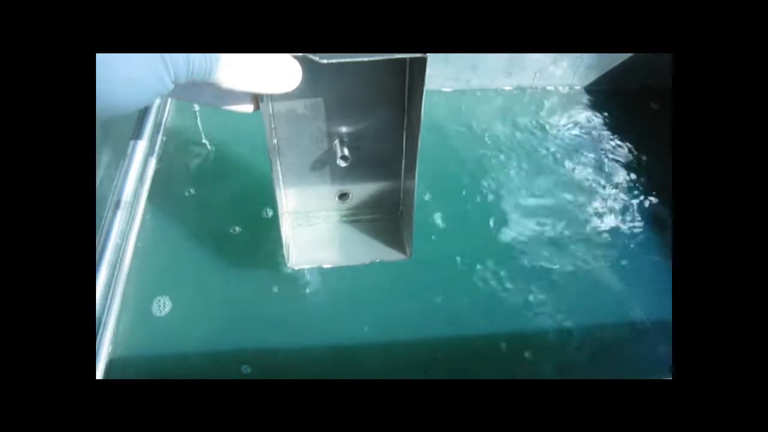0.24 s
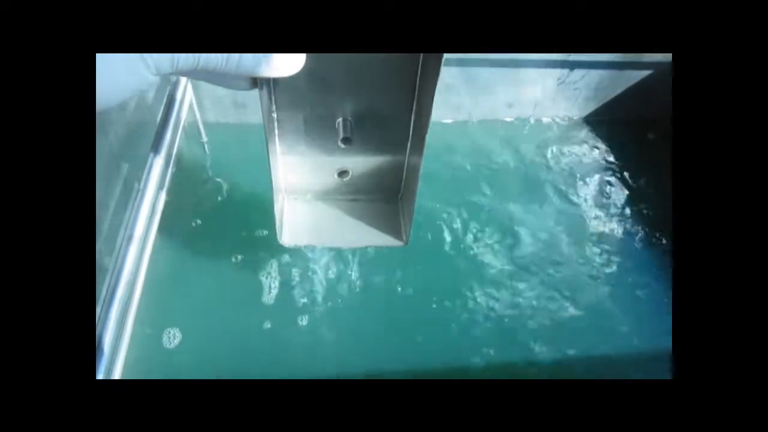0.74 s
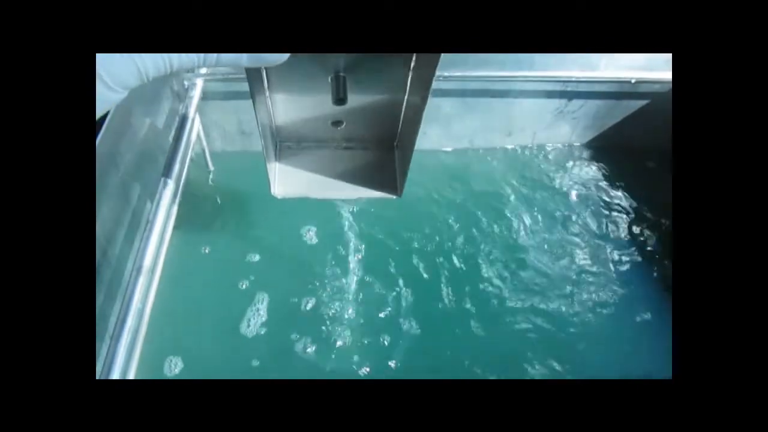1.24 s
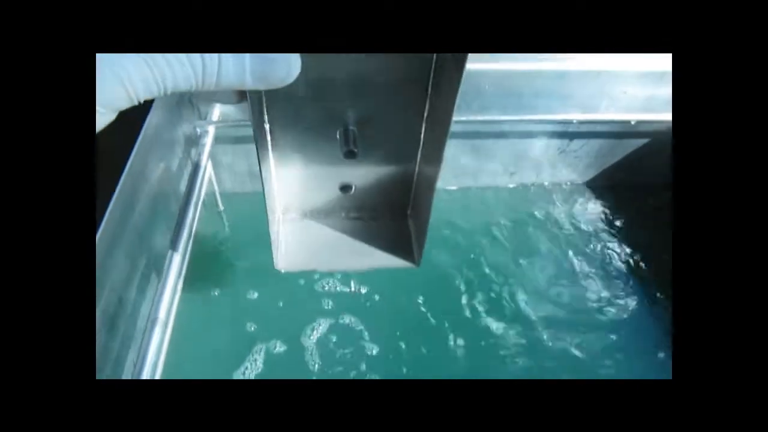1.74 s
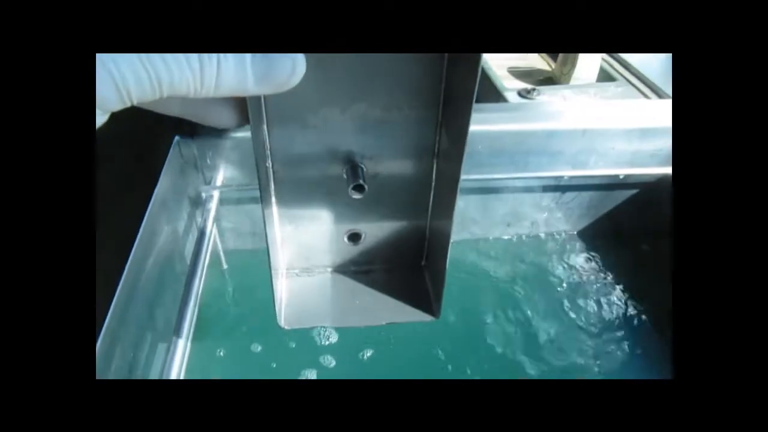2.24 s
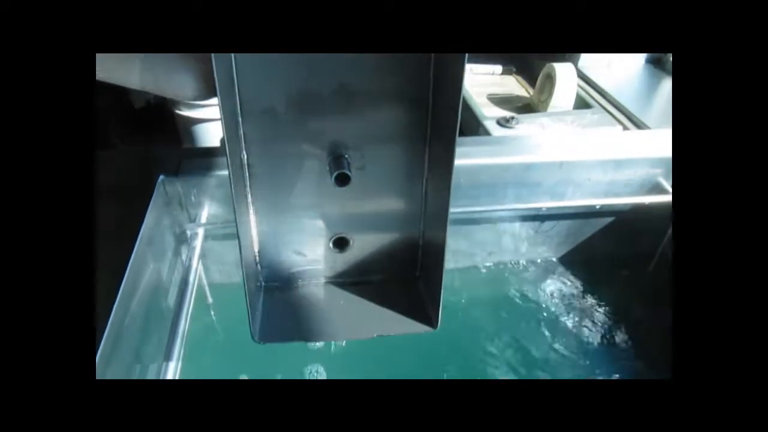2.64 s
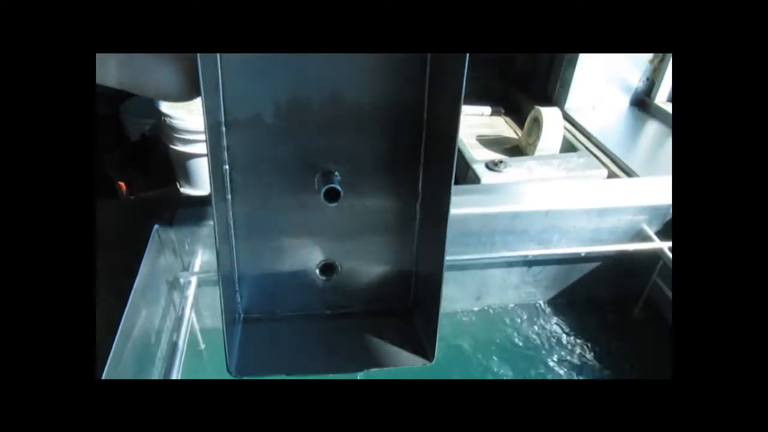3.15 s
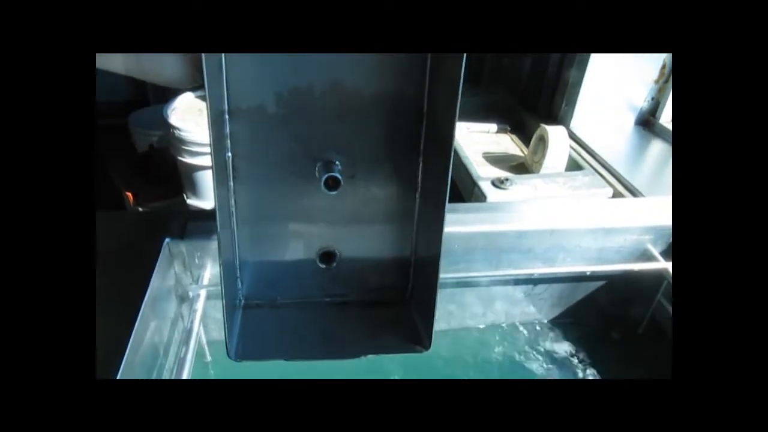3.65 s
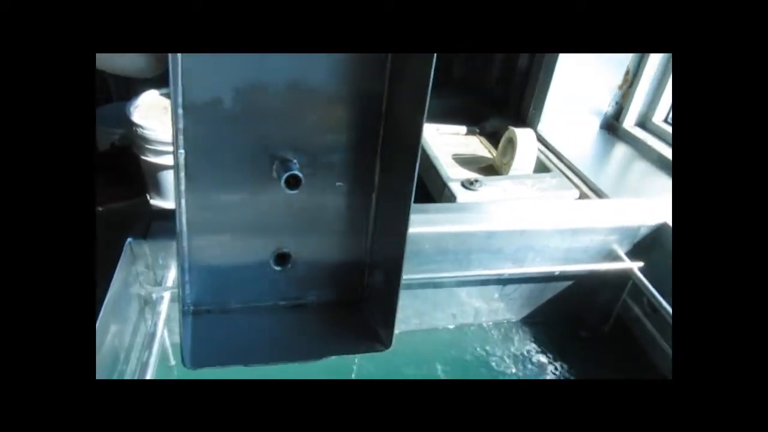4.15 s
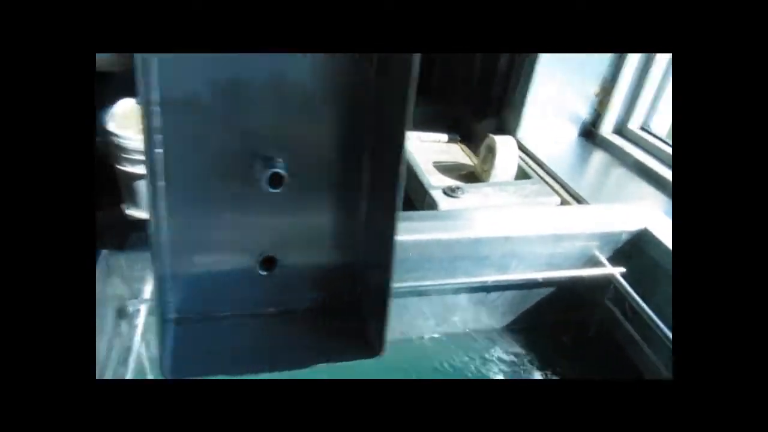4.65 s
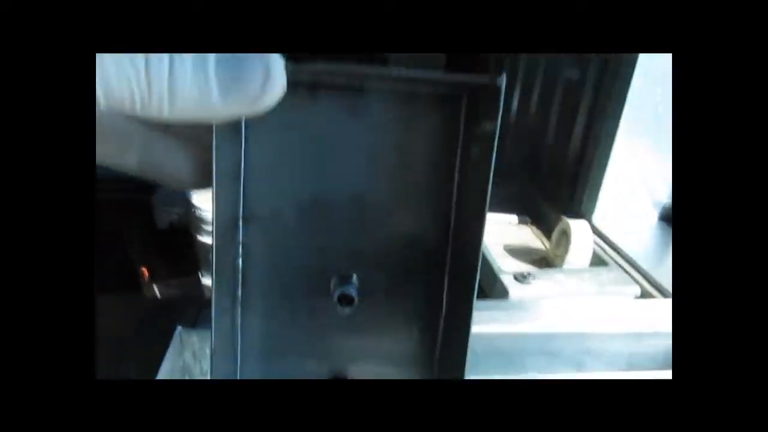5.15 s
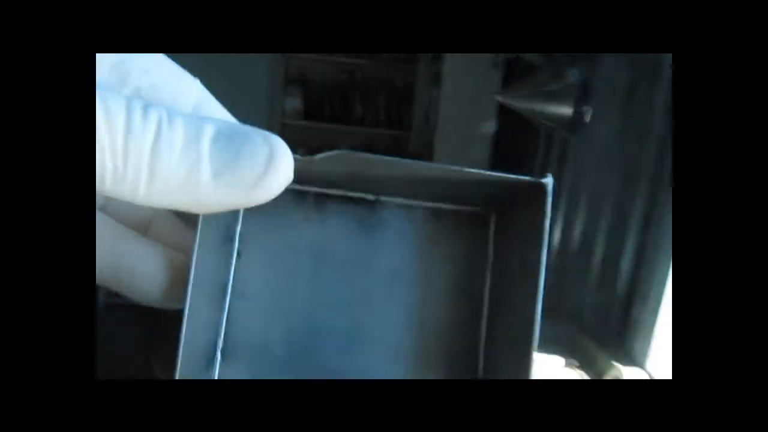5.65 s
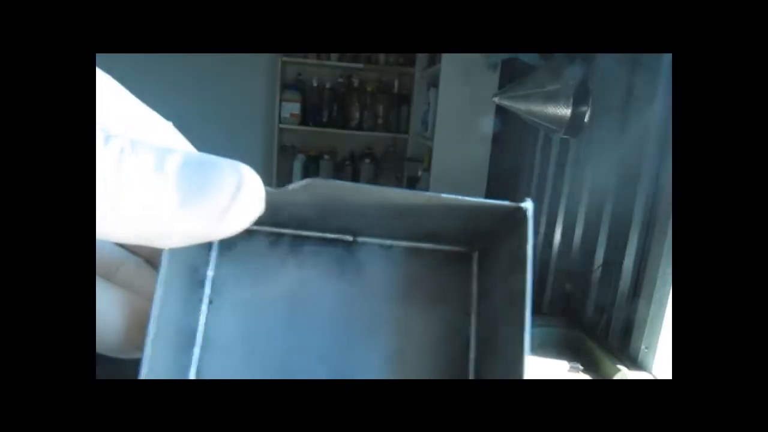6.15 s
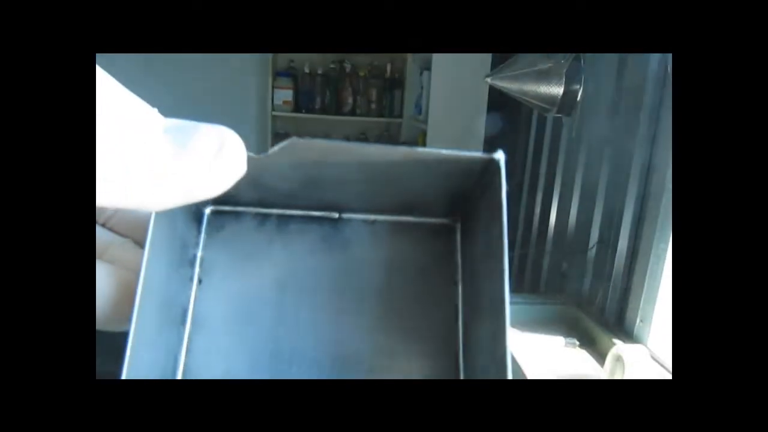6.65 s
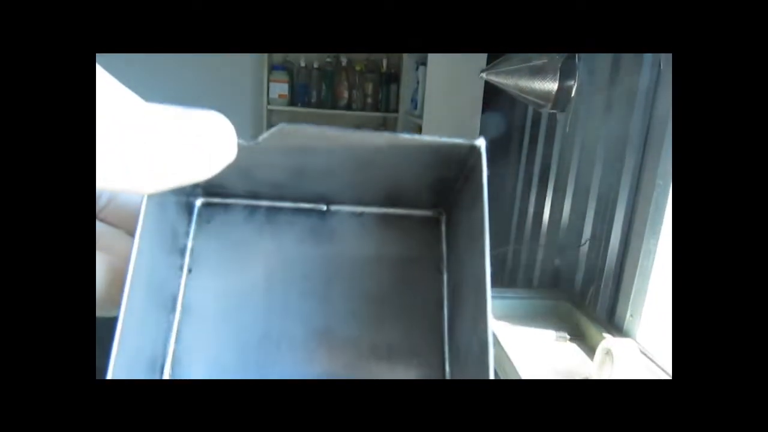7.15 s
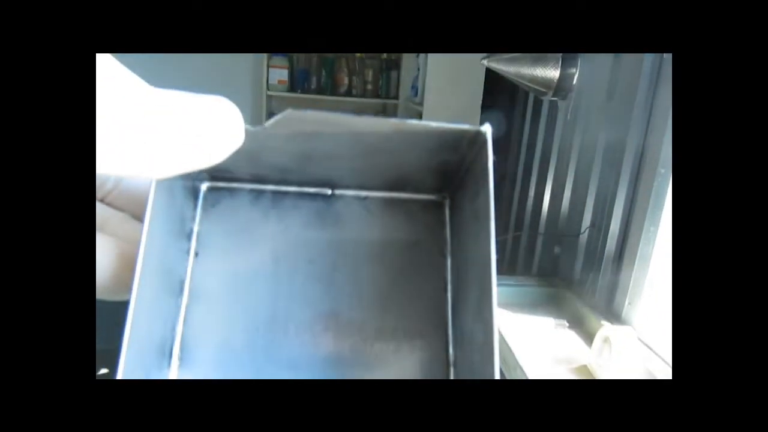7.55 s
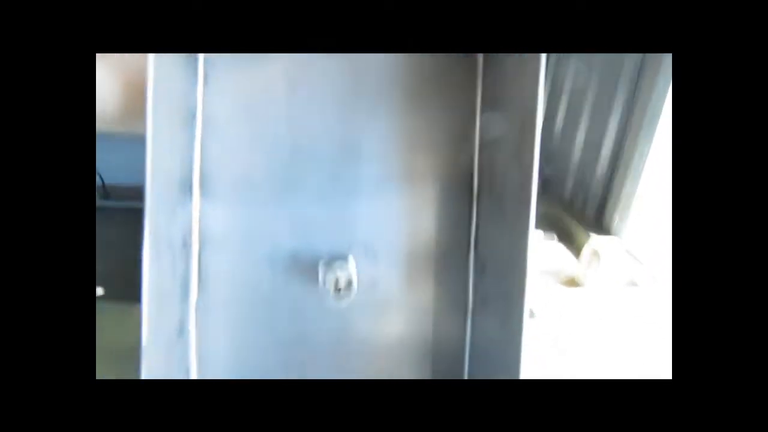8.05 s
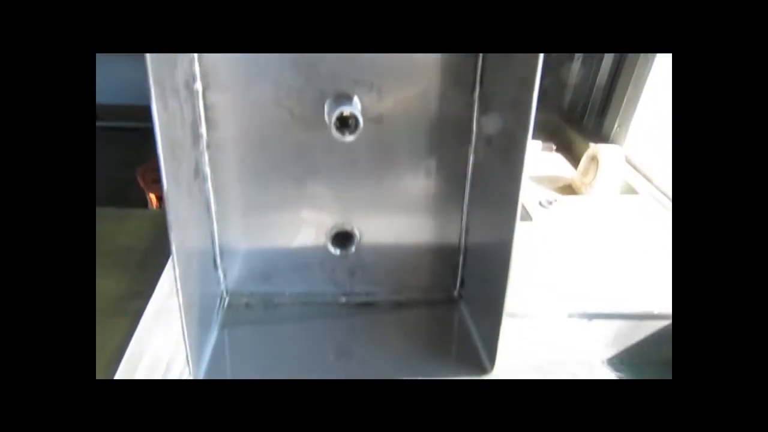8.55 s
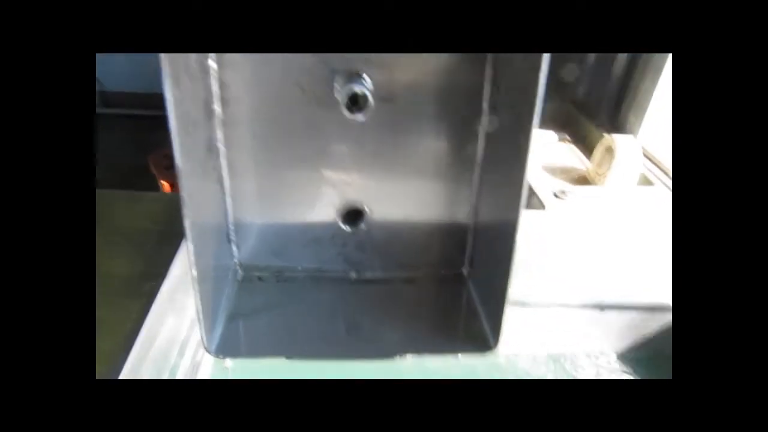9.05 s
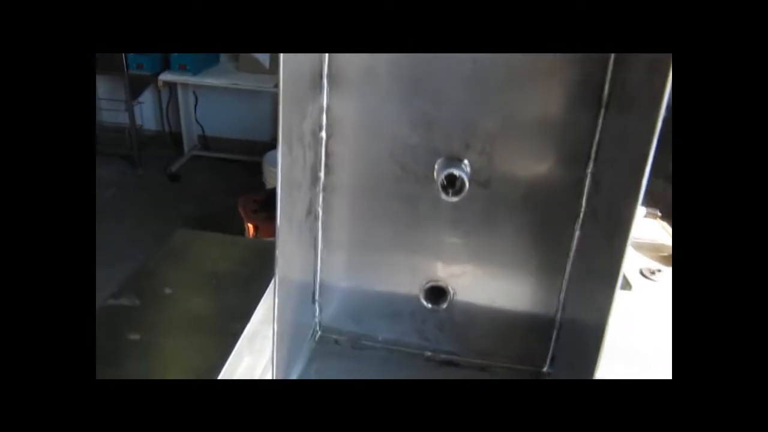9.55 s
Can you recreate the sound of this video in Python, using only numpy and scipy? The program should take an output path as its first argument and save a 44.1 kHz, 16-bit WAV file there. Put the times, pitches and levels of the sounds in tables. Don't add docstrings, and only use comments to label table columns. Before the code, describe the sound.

Loud, overdriven high-pitched screeching hiss of an ultrasonic bath, constant throughout, with one soft early bump and a duller, slightly lower tone later.

```python
import sys
import numpy as np
from scipy import signal
from scipy.fft import rfft, irfft
from scipy.io import wavfile
from scipy.ndimage import uniform_filter1d

SR = 44100
rng = np.random.default_rng(int(sys.argv[2]) if len(sys.argv) > 2 else 0)


def wav_record(signal):
    frames = np.transpose(np.atleast_2d(signal))
    bounded = np.clip(frames, -1, 1)
    quanta = np.round(bounded * 32767).astype(np.int16)
    wavfile.write(sys.argv[1], SR, quanta)


def volts(x):
    e = np.asarray(x, float) / 20
    return 10 ** e


N = 432180

FRAME, GRID = 1024, 550
SKIRT_HZ = 12170


def level(x):
    return x / np.sqrt(np.mean(x ** 2))


def aim(column):
    # time in seconds, open view of the water 0-1, shading of the microphone by the steel part 0-1.
    tilt = [(0, 1, 0), (1.6, 0.82, 0.06), (3.6, .52, 0.21), (4.6, 0.61, 0.2), (5.2, 0.58, 0.2),
            (5.4, .3, .22), (5.55, 0.1, 0.72), (5.68, 0, 0.68), (6, .01, 0.51), (7.75, 0.02, 0.57),
            (8.2, 0.09, 0.7), (8.75, 0.18, .9), (9.4, 0.06, 0.9), (9.8, 0.01, 1)]
    rows = np.array(tilt)
    seconds = np.arange(N) / SR
    return np.clip(np.interp(seconds, rows[:, 0], rows[:, column]), 0, 1)


def facing(ends):
    away, toward = ends
    return away + (toward - away) * aim(column=1) ** 0.65


def shaded(ends):
    bare, covered = ends
    return bare + (covered - bare) * aim(column=2)


def throb(depth):
    throb_hz, start_turn = 120.03, 0.37
    return 1 + depth * np.cos(2 * np.pi * (throb_hz * np.arange(N) / SR + start_turn))


def walk(rate):
    hold = int(SR / rate)
    steps = np.repeat(rng.standard_normal(N // hold + 1), hold)
    smooth = uniform_filter1d(uniform_filter1d(steps, hold), hold)
    return level(smooth[:N])


def bubbles(scatter_db):
    strength = volts(scatter_db * rng.standard_normal(N))
    return level(rng.standard_normal(N) * strength)


def ring(hz, centre_hz, width_hz, db):
    distance = 2 * (hz - centre_hz) / width_hz
    return volts(db) ** 2 / width_hz / (1 + distance ** 2) ** 2


def shaped(x, rings):
    hz, seconds, frames = signal.stft(x, SR, nperseg=1024)
    at = np.minimum((seconds * SR).astype(int), N - 1)
    power = 0
    for settings in rings:
        centre_hz, width_hz, db = (np.broadcast_to(curve, N)[at] for curve in settings)
        power = power + ring(hz[:, None], centre_hz, width_hz, db)
    return signal.istft(frames * np.sqrt(power * SR / np.pi * 2), SR, nperseg=1024)[1][:N]


def whistle():
    upper_db = shaded((2.5, -6)) + 0.57 * walk(12)
    lower_db = shaded((-4.5, 2)) + 0.36 * walk(12)
    narrow = facing((0.77, 1.13))
    upper = (shaded((9780, 9460)), shaded((3130, 3000)) * narrow, upper_db)
    lower = (shaded((8640, 8100)), shaded((2320, 2600)) * narrow, lower_db)
    shoulder_db = upper_db - 10 + shaded((-1, 2)) + facing((-1.5, 0.5))
    shoulder = (SKIRT_HZ, 3200, shoulder_db)
    upper_crest = (shaded((10000, 9500)), 800, upper_db - 11)
    lower_crest = (8220, 650, lower_db - 8.5 + shaded((-2, -2)))
    return shaped(bubbles(1.48), [upper, lower, shoulder, upper_crest, lower_crest])


def wall():
    db = shaded((-14.5, -10.5)) + 0.18 * walk(12)
    broad = (5470, 2400, db)
    lowest = (5000, 900, db - 11.5)
    return shaped(bubbles(1.0), [broad, lowest])


def hiss(scatter_db):
    spray_db = -14.5
    power = facing((0.12, 1))
    return volts(spray_db) * np.sqrt(power) * bubbles(scatter_db) * throb(0.18)


def tank():
    ringing = whistle() + volts(-5.0) * wall()
    return ringing * throb(0.13) + hiss(scatter_db=2.5)


def folded():
    return shaped(bubbles(0.8), [(16000, 4000, -41)])


def bump():
    start_s, peak_db, decay_s = 0.888, -38, 0.02
    t = np.arange(N) / SR - start_s
    return -volts(peak_db) * np.clip(t / 0.002, 0, 1) * np.exp(-np.maximum(t, 0) / decay_s)


def scene():
    drive_db = facing((1, 6.5))
    return np.tile(volts(drive_db) * tank(), (2, 1))


def saturate(x, bias, knee):
    fine = signal.resample_poly(x + bias, 2, 1)
    squashed = fine / (1 + np.abs(fine) ** knee) ** (1 / knee)
    return signal.resample_poly(squashed, 1, 2)


def microphone(x):
    # frequency in Hz, level in dB.
    response = [(20, -5), (60, -4.5), (250, -0.5), (1000, 0.6), (3500, -0.6), (11000, -2), (12500, -4),
                (16000, -7.5)]
    points = np.array(response)
    hz = np.fft.rfftfreq(N, 1 / SR)
    gain = volts(np.interp(np.log(hz + 1), np.log(points[:, 0]), points[:, 1]))
    gain[hz < 2] = 1
    return irfft(rfft(x) * gain * (hz < 15745), N)


def swaps():
    # time in seconds, centre in Hz, width in Hz.
    whistle_swaps = [(.384, 7580, 1400), (.477, 7580, 1400), (.547, 8270, 1400), (.848, 9300, 2100),
                     (.988, 10330, 1400), (1.591, 8600, 2800), (1.638, 10330, 1400), (2.265, 8960, 1400),
                     (2.474, 8960, 2800), (2.752, 10330, 1400), (3.124, 10330, 2800), (3.542, 9650, 1400),
                     (3.658, 7580, 1400), (4.68, 10680, 2100), (4.726, 7230, 2100), (5.051, 8960, 2800),
                     (5.492, 9650, 1400), (5.539, 8270, 1400), (5.608, 9650, 1400), (7.025, 9650, 2800),
                     (7.373, 8960, 2800), (7.605, 9650, 1400), (8.232, 8960, 1400), (8.395, 7580, 1400),
                     (8.488, 7920, 2100), (9.765, 7580, 1400)]
    wall_swaps = [.547, .848, 1.011, 1.057, 1.243, 3.519, 4.099, 4.308, 4.424, 4.703, 5.492, 5.539, 5.585,
                  5.632, 6.003, 6.352, 7.466, 7.605, 8.209, 8.395, 9.44, 9.649]
    shoulder_swaps = [.547, 1.475, 1.638, 2.149, 3.449, 3.588, 3.612, 4.424, 5.051, 7.164, 7.791, 7.954,
                      9.44, 9.509]
    width_hz = 1600
    top_frames = 1 + rng.choice(N // FRAME - 3, 24, replace=False)
    top_swaps = (GRID + FRAME * top_frames) / SR
    patches = list(whistle_swaps)
    patches += [(s, 5650, width_hz) for s in wall_swaps]
    patches += [(s, SKIRT_HZ, width_hz) for s in shoulder_swaps]
    patches += [(s, 14500, width_hz) for s in top_swaps]
    return patches


def noise_fill(mono, fill_db):
    out = np.tile(mono, (2, 1))
    window = np.sin(np.pi * (np.arange(2 * FRAME) + 0.5) / (2 * FRAME))
    place = np.arange(2 * FRAME) + 0.5 + FRAME / 2
    lines_per_hz = 2 * FRAME / SR
    for s, hz, width_hz in swaps():
        start = GRID + FRAME * (round((s * SR - GRID) / FRAME) - 1)
        first = round((hz - width_hz / 2) * lines_per_hz)
        last = round((hz + width_hz / 2) * lines_per_hz)
        lines = np.arange(first, last) + 0.5
        basis = np.cos(np.pi / FRAME * lines[:, None] * place) * window
        heard = basis @ mono[start:start + 2 * FRAME]
        band_rms = np.sqrt(uniform_filter1d(heard ** 2, size=32))
        filled = volts(fill_db) * band_rms * rng.standard_normal((2, len(lines)))
        out[:, start:start + 2 * FRAME] += (filled - heard) @ basis * 2 / FRAME
    return out


def top_cut(x):
    return signal.sosfilt(signal.butter(12, 16890, fs=SR, output="sos"), x)


def record(dry):
    ceiling_db = -15.5 + shaded((0, 1.3)) + facing((-0.44, 0.17))
    clipped = saturate(dry[0], bias=0.14 * aim(column=1), knee=2.68) * volts(ceiling_db)
    late_hiss = volts(-16.5) * hiss(scatter_db=1.4)
    body_wall = volts(-23.5) * wall()
    heard = microphone(clipped + late_hiss + body_wall + folded() + bump())
    mix = noise_fill(heard, fill_db=-0.7)
    return top_cut(mix)


dry = scene()
out = record(dry)
wav_record(out)
```